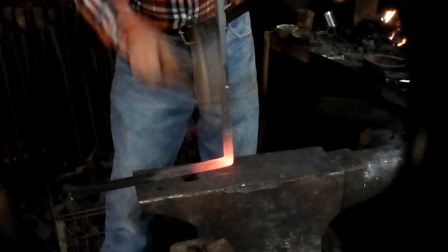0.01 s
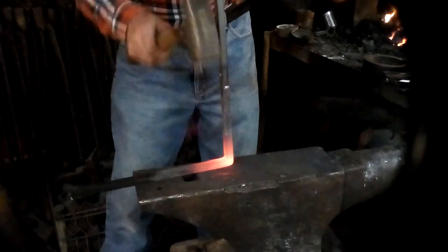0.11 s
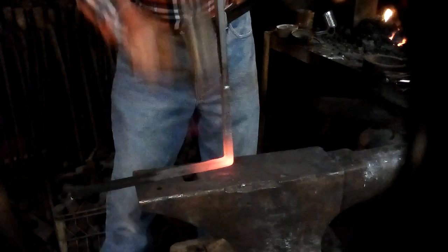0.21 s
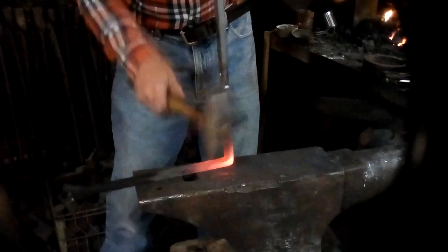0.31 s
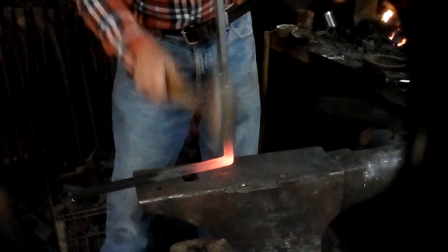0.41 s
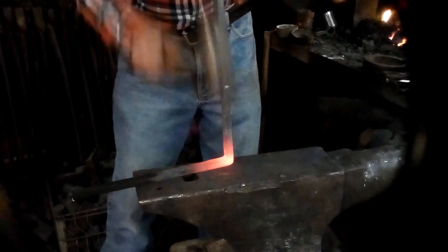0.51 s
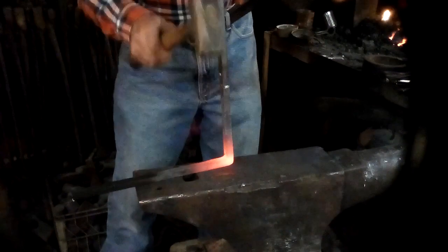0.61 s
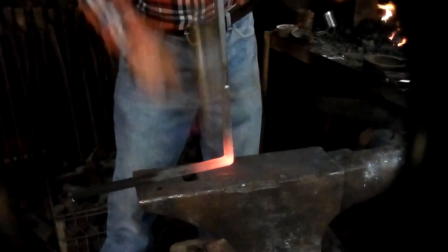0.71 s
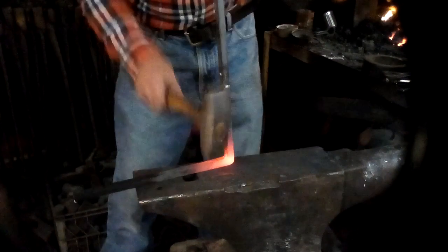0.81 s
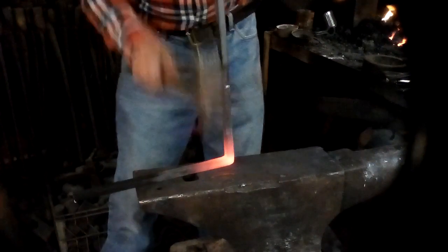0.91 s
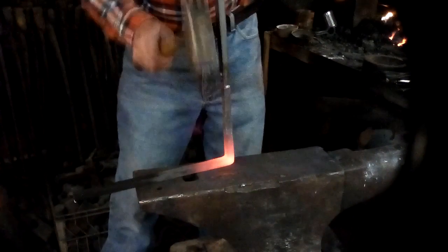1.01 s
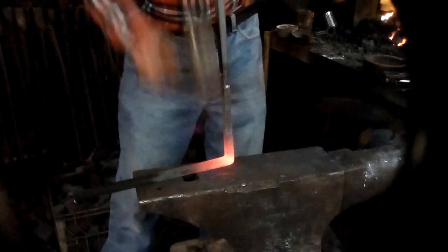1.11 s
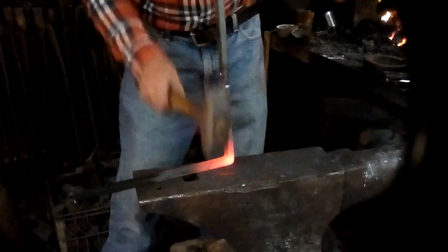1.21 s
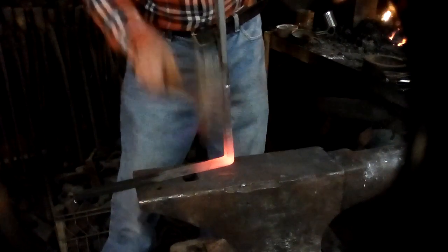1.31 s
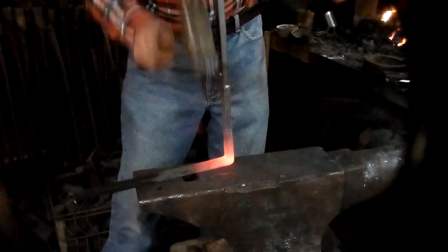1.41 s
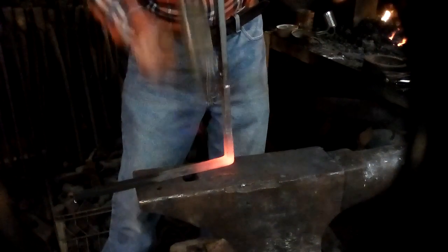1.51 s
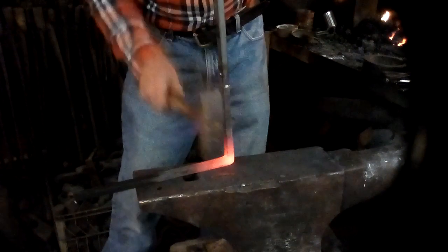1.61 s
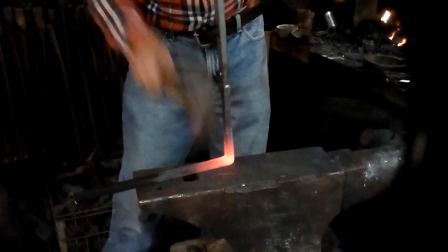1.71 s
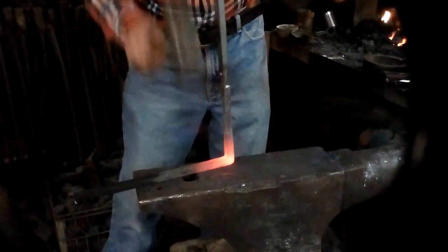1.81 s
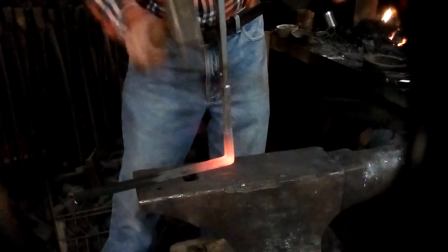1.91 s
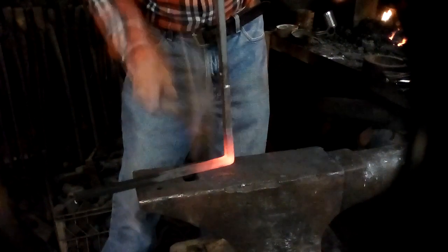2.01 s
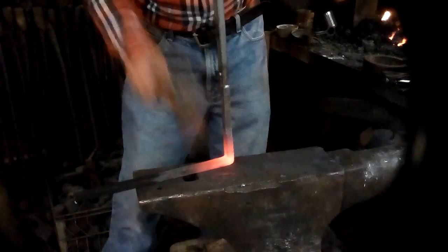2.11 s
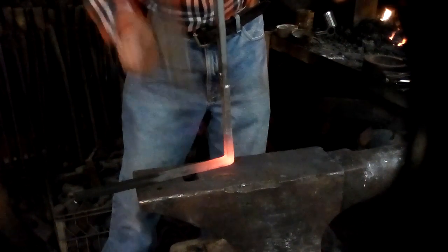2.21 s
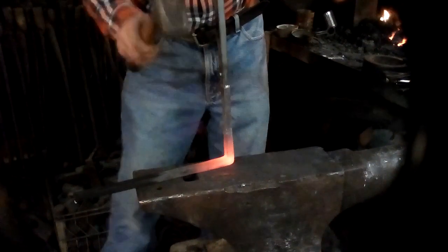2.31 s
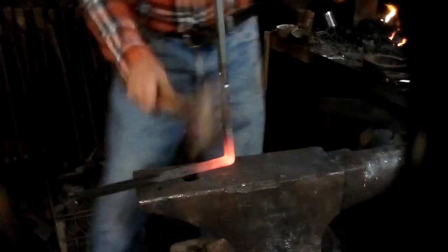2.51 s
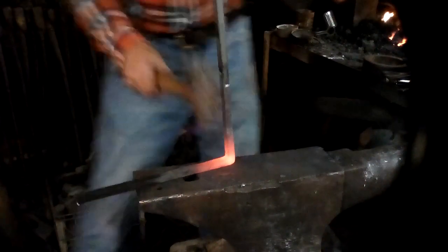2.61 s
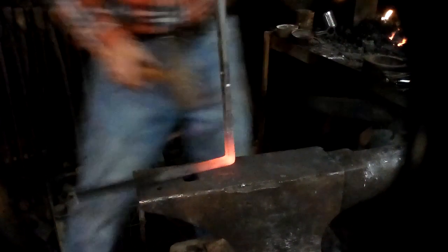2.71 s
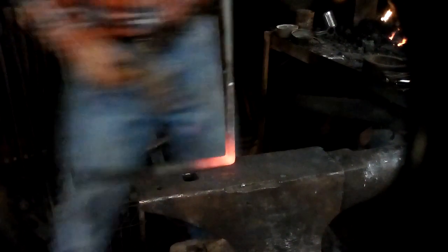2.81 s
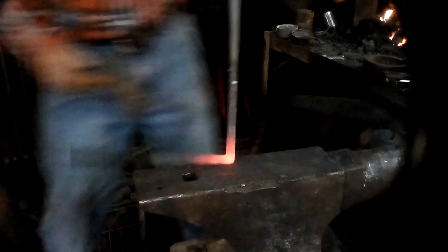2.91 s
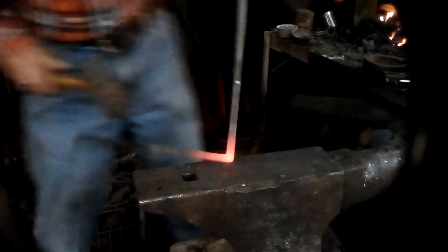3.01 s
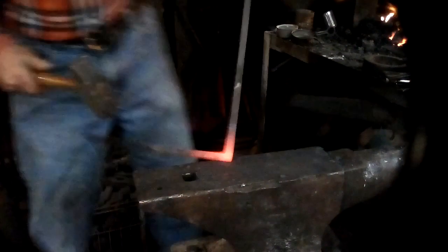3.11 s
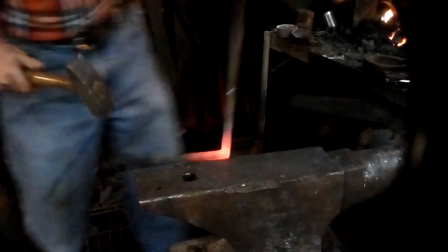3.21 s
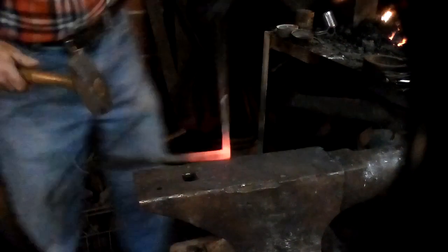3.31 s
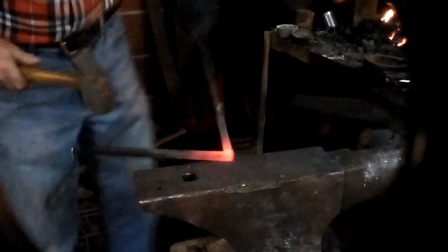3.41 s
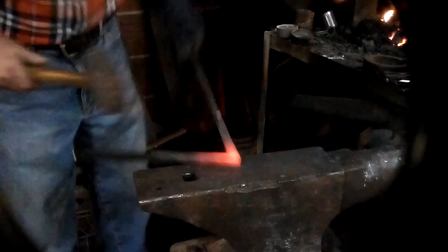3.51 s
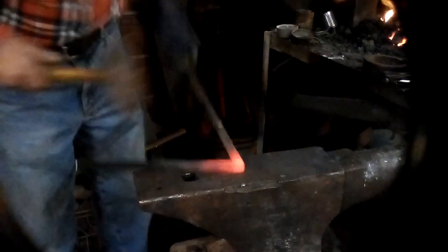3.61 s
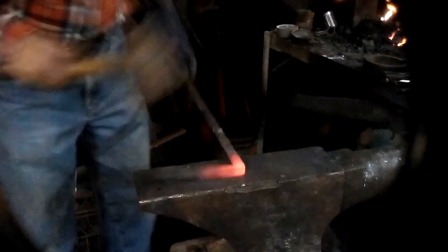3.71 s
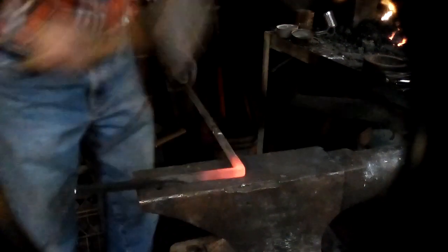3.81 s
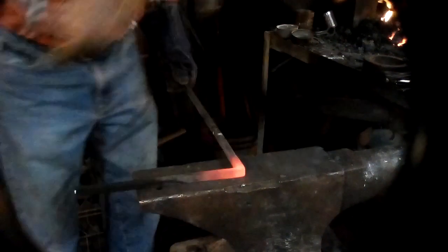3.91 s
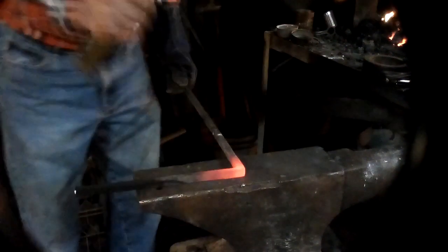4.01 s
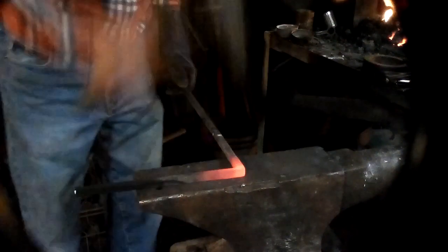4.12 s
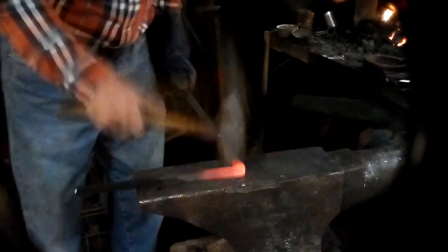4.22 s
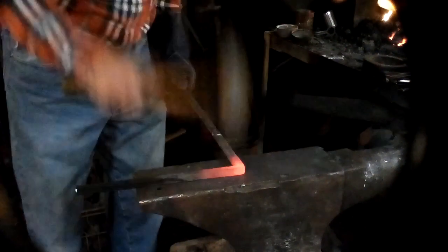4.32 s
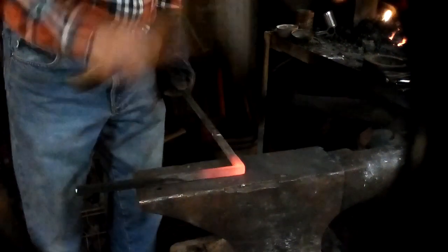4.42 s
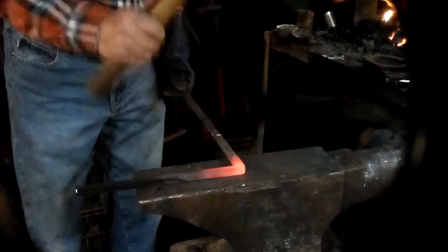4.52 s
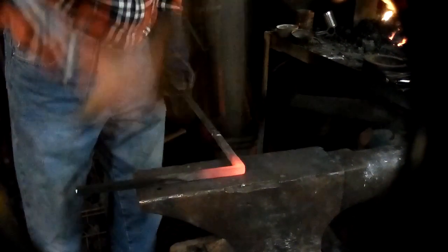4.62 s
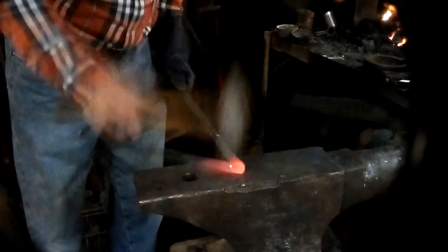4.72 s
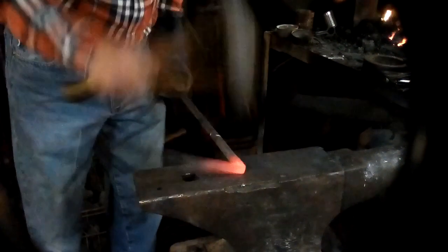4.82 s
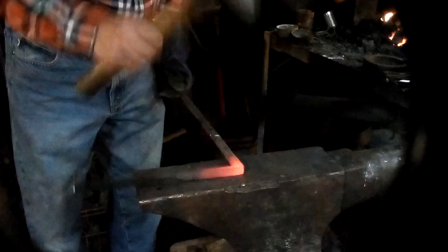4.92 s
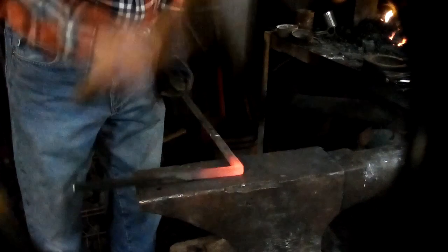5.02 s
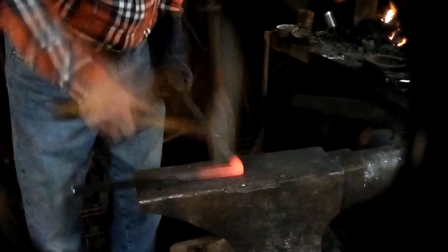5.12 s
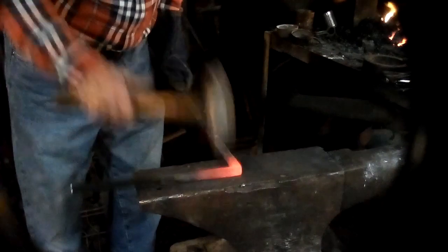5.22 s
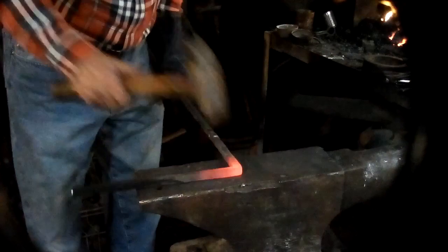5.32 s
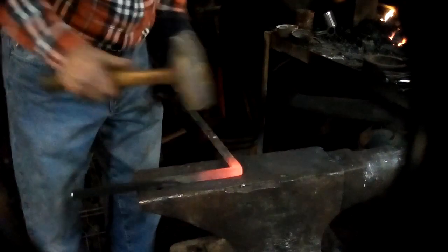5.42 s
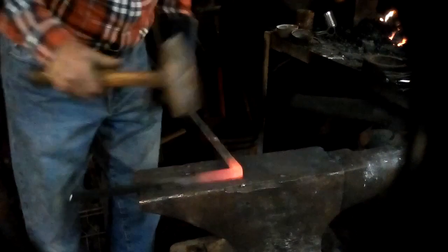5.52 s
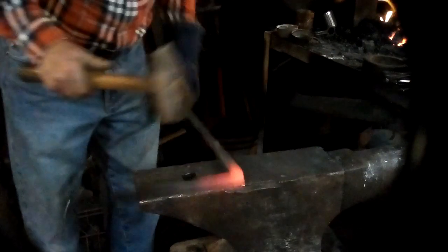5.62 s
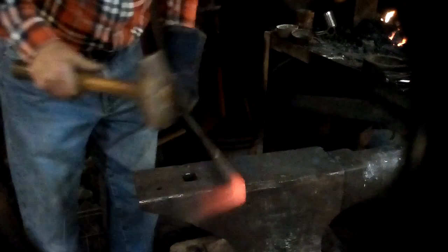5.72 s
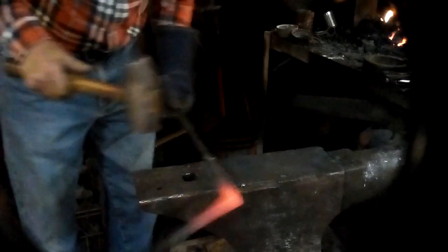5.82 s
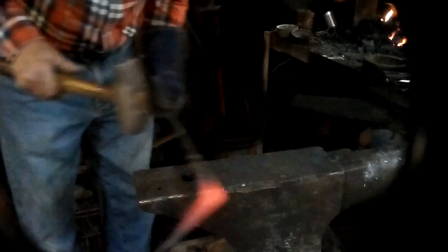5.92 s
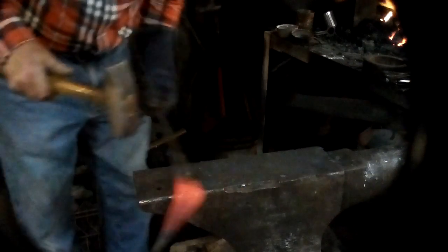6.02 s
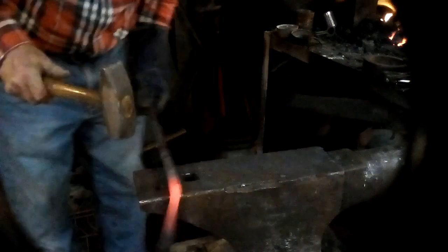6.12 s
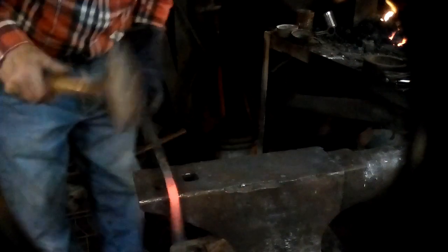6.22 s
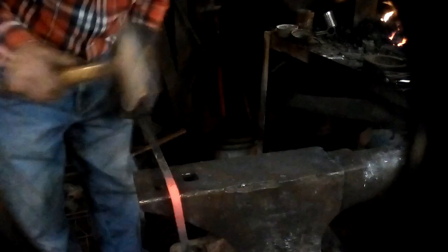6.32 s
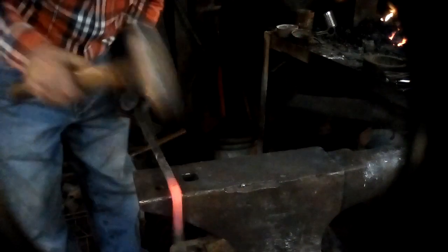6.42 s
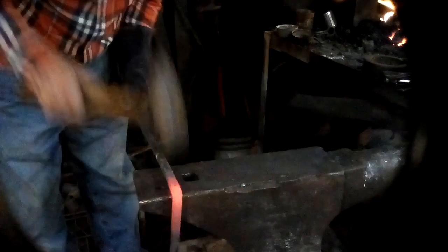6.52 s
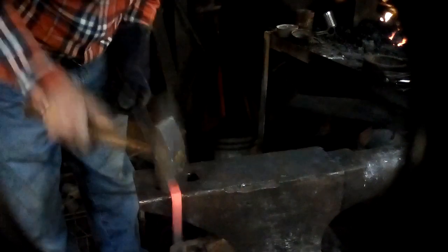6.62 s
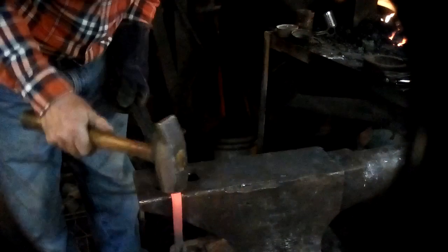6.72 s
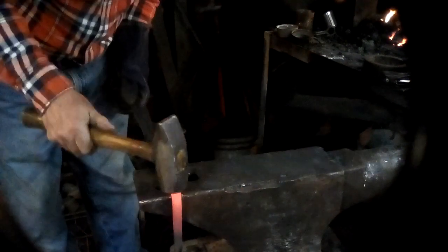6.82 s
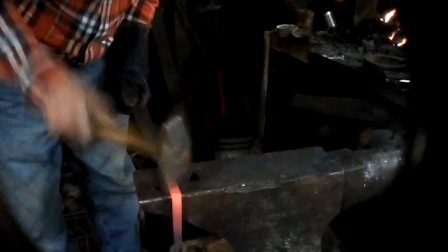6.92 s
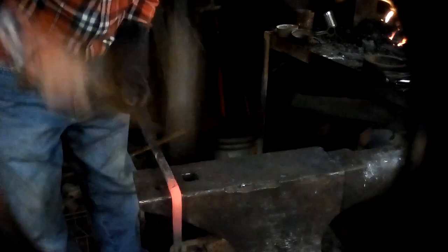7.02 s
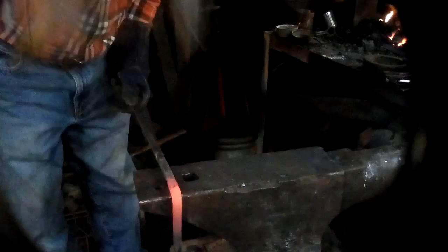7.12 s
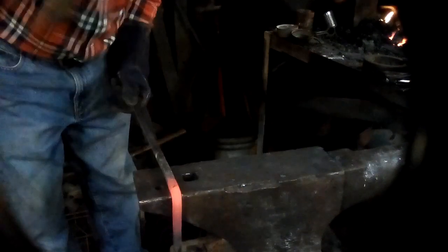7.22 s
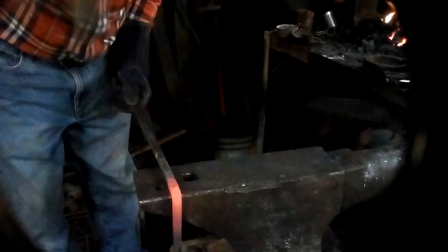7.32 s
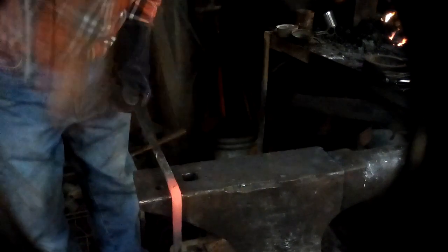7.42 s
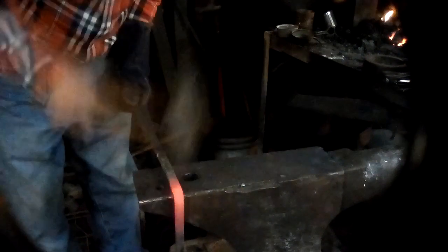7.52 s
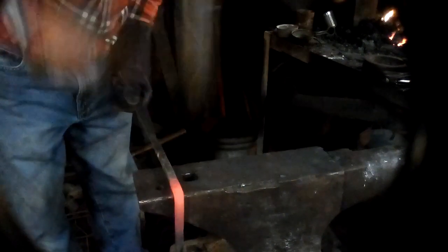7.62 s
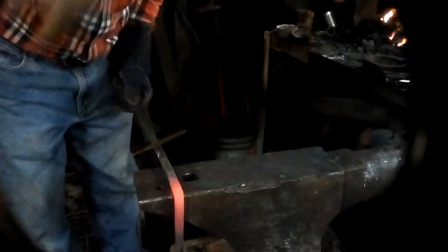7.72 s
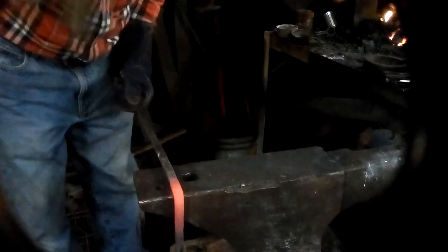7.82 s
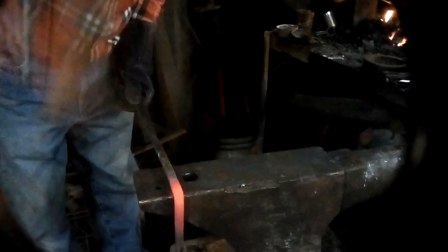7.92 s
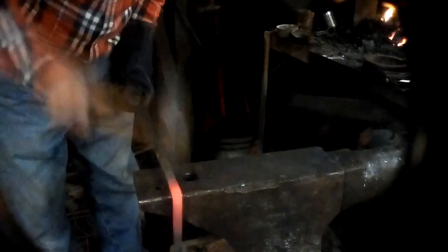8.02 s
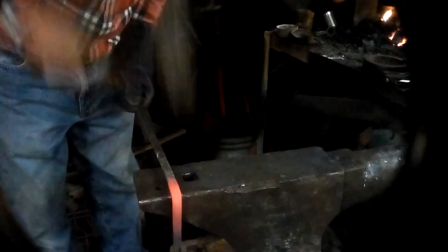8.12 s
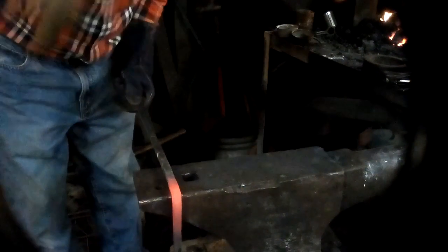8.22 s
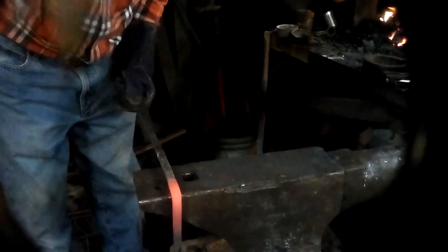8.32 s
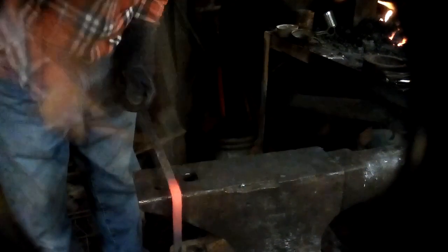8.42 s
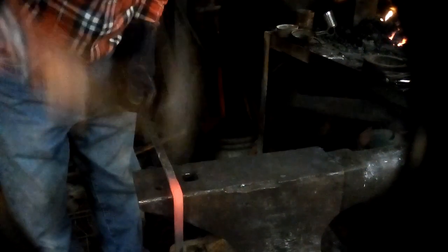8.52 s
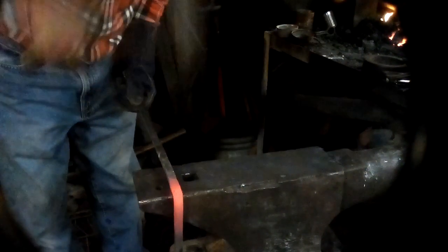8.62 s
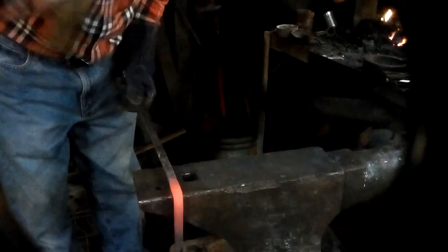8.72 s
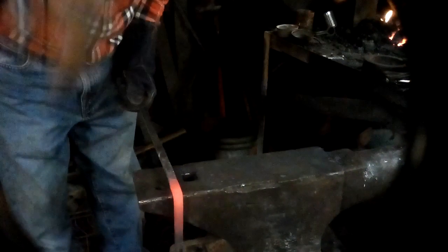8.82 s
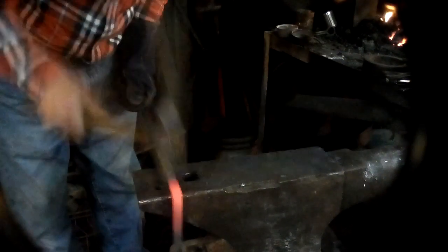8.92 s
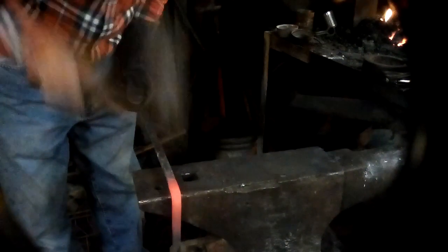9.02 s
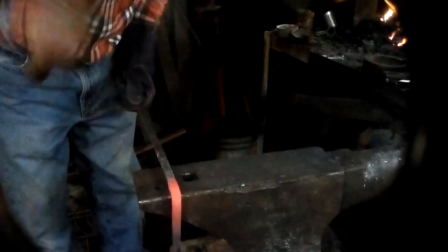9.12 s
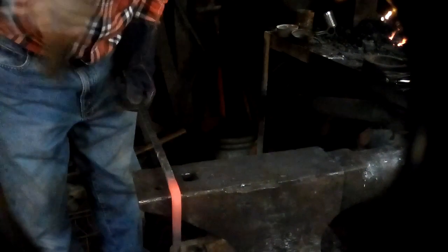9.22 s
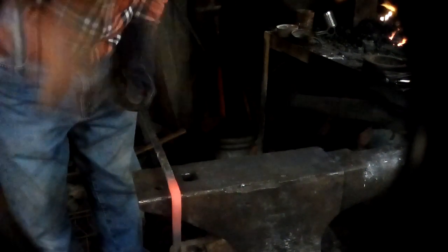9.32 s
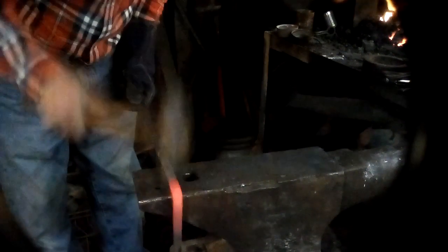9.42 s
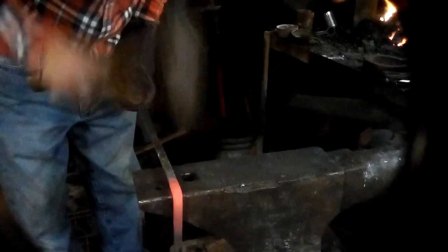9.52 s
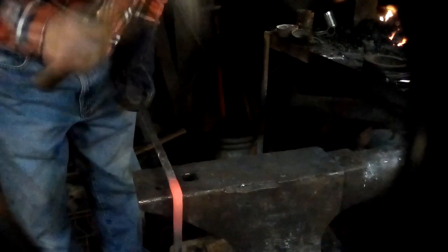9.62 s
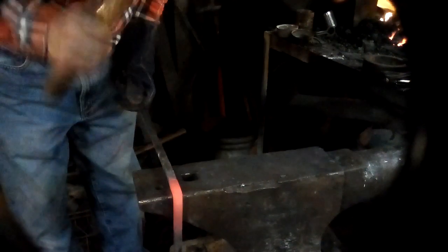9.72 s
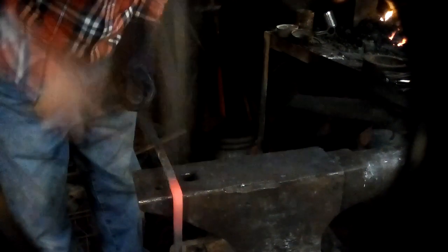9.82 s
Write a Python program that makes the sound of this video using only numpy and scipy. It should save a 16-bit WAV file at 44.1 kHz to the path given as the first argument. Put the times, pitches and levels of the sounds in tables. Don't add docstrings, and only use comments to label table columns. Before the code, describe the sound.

Close, loud anvil hammering: each blow is a broadband crack with a small thud and a quickly fading metallic ring. Three runs at roughly two blows a second are separated by shuffling boots, sliding metal and knocks of the bar. The last run rings most freely. Short room reverberation, faint steady forge hum and hiss, mono sound with flattened, slightly overloaded peaks.

```python
import sys
import numpy as np
from scipy import signal
from scipy.io import wavfile
from scipy.ndimage import uniform_filter1d

SR = 44100
rng = np.random.default_rng(int(sys.argv[2]) if len(sys.argv) > 2 else 0)


def boost(x):
    u = np.asarray(x, float) / 20
    return 10 ** u


def to_wav(s):
    ch = np.atleast_2d(s).T
    pcm = np.round(np.clip(ch, -1, 1) * 32767)
    wavfile.write(sys.argv[1], SR, pcm.astype(np.int16))


N = 434385

ANVIL_HZ = [1335, 1690, 1832, 1910, 2095, 2372, 2490, 2618, 2709, 2903, 3387, 3424, 3635, 3760, 4010, 4272,
            4599, 4935, 5157, 5658, 5825, 6000, 6135, 6230, 6605]
HEAD_HZ = [6968, 7300, 7570, 7900, 8252, 8487, 8935, 9405, 9630, 10325, 10540, 11390, 11820, 12100, 12785,
           13475, 13790, 14320, 14735, 14830, 15455, 15615]
SPLIT_HZ = rng.uniform(7.5, 8.8, len(ANVIL_HZ + HEAD_HZ))


def evened(x):
    return x / np.sqrt(np.mean(x ** 2) + 1e-20)


def read(points, hz):
    f, value = np.transpose(points)
    return np.interp(np.log(hz + 1), np.log(f + 1), value)


def add(mix, s, sound):
    part = mix[round(s * SR):][:len(sound)]
    part += sound[:len(part)]


def coloured(x, points):
    log_gain = np.log(evened(boost(read(points, np.fft.rfftfreq(8192, 1 / SR)))))
    circle = np.concatenate([log_gain, log_gain[-2:0:-1]])
    spectrum = np.exp(np.conj(signal.hilbert(circle)))
    taps = np.fft.ifft(spectrum).real[:4096]
    return signal.oaconvolve(x, taps)[:len(x)]


def air():
    # frequency in Hz, spectrum level in dB per Hz.
    air_tone = [(15, -46), (25, -9), (103, 3.5), (470, -1.5), (510, -4), (634, -8), (1320, -11.5),
                (1640, -11), (2600, -15.5), (4240, -14.5), (4990, -12.5), (8140, -30.5), (12900, -42.5),
                (15200, -18), (16500, -26)]
    return boost(-59) * coloured(rng.standard_normal(N), air_tone)


def stroke(make, top_s, top_db, swell, fade):
    t = np.arange(-.2, .3, 1 / SR)
    down_db = np.where(t < 0, -t * swell, t * fade)
    gate = np.clip(4 - 1.5 * down_db / 30, 0, 1)
    envelope = boost(top_db - down_db) * gate * signal.windows.tukey(len(t), .1)
    return top_s + t[0], envelope * evened(make(len(t)))


def shuffling(length):
    shuffle_tone = [(50, -28), (130, 11), (280, 21.5), (500, -20), (1500, -34), (16000, -70)]  # (Hz, dB per Hz)
    return coloured(rng.standard_normal(length), shuffle_tone)


def rasping(length):
    # frequency in Hz, spectrum level in dB per Hz.
    rasp_tone = [(88, -14), (150, 6), (366, -11), (601, -3), (906, -9), (1890, -6), (2710, -14),
                 (5200, -15), (9000, -45), (11700, -79), (19800, -120)]
    grain_db = 1.7 * rng.exponential(1, length)
    return coloured(rng.standard_normal(length) * boost(grain_db), rasp_tone)


def modes(column, last, rise_s):
    # level in dB when struck upright, flat, over the edge, knocked.
    anvil_db = [(0.0, -9.5, -17.0, 13.5), (2.5, 1.5, 6, 14), (5.5, -12.5, 8, 11), (1.5, 4.5, 13.0, 3.5),
                (3, 1.0, -4, 9), (4.0, -6.0, 11.5, 6.0), (-12.0, -8.5, 8, 8), (-31.5, -22.0, 19, -7.5),
                (-19.5, 12.5, 18.5, 14), (9.0, 5.5, 15, 17.5), (-1.0, 3.5, 11, -19.5),
                (10, 2.0, 15.0, 16.5), (6.0, 5.5, 8.5, 4), (6.5, 8.0, -2.5, 11.5), (0.0, 6.5, 6, -2.0),
                (11.0, 11.5, 13.5, 21.5), (7.0, 10.5, 14.0, 6), (10, 9.5, 6, -6.5), (-20.0, -4.5, 3, -22.0),
                (14, 10.5, 18.5, 13.5), (-11.5, 3, 8, -21.5), (9, 9, -1.5, -12), (0.0, 10, -8.5, 3),
                (3.5, 2.5, 1.5, -14.5), (5.5, 8.5, 6.0, -3.0)]
    # level in dB when struck upright, flat, over the edge, knocked.
    head_db = [(-7.0, -2.0, -9, -25.0), (-6, 1.5, -3, -24.0), (-11.5, -7.5, -15.5, -4),
               (-11.5, -14, -17.0, -10.5), (-16.5, -8.5, -19.5, -31.5), (-12.5, -9, -28.5, -10.0),
               (-8.0, -8, -26.0, -14.0), (-12.5, -10.0, -36.0, -24.5), (-9, -14.5, -30, -23.5),
               (-21, -29.5, -23.0, -33.5), (-15.5, -15, -14, -17.0), (-16.5, -22.0, -18, -33.5),
               (-23.5, -20.5, -36, -34.0), (-15, -17.5, -40.0, -33.0), (-18.5, -26.5, -38, -32.0),
               (-16.5, -35.5, -32.0, -35.0), (-28.0, -33.0, -24.0, -41.5), (-16.5, -15.0, -22.0, -32.5),
               (-25.5, -10.0, -13.5, -32.5), (-4, -3.5, -22.0, -37.5), (-11.0, -3.5, -27, -25.0),
               (-5.5, -10.0, -13.0, -25.0)]
    damped_hz = [1832, 1910, 2095, 2618, 3387, 3635, 3760, 5157, 6000, 6135, 6230, 6605, 10540, 14735,
                 14830, 15455]
    pure_hz = [2709, 2903]
    t = np.arange(SR // 2) / SR
    level_db = np.array(anvil_db + head_db)[:, column, None]
    hz = np.array(ANVIL_HZ + HEAD_HZ)[:, None]
    width_hz = np.where(np.isin(hz, HEAD_HZ), 42, 27.2)
    width_hz = width_hz * np.where(np.isin(hz, damped_hz), 2.8, 1)
    fall = width_hz * boost(level_db - 60 * t * width_hz / last)
    twin = np.where(np.isin(hz, pure_hz), .35, .8)
    pair = np.sin(2 * np.pi * hz * t) + twin * np.sin(2 * np.pi * (hz - SPLIT_HZ[:, None]) * t)
    return fall * pair * (1 - np.exp(-t / rise_s)) * np.cos(np.pi * t) ** .5


def ringing(bank, favoured_hz, treble_db, scatter_db):
    hz = np.array(ANVIL_HZ + HEAD_HZ)
    level_db = scatter_db * rng.standard_normal(len(hz)) + treble_db * (hz > 7500)
    for f in favoured_hz:
        distance = abs(hz - f)
        level_db = level_db + 10 * (distance == distance.min())
    ring = (boost(level_db) * rng.choice([-1, 1], len(hz))) @ bank
    return ring / np.sqrt(np.mean(ring[:400] ** 2))


def sliding(length):
    out, bank = np.zeros(length), modes(column=3, last=4.1, rise_s=0.0036)
    for _ in range(8):
        slips = (rng.random(length) < 40 / SR) * rng.standard_normal(length)
        out += signal.fftconvolve(slips, ringing(bank, [2490], 3.0, 7.0))[:length]
    return evened(out) + evened(rasping(length))


def handling():
    # top in seconds, level in dB, swell in dB a second, fade in dB a second.
    steps = [
        (3.06, -52, 600, 300),
        (3.215, -49, 600, 120),
        (3.344, -43, 900, 440),
        (3.49, -49, 900, 70),
        (5.75, -45.5, 37, 150),
        (5.93, -58, 800, 500),
        (7.11, -58, 500, 170),
        (7.32, -65, 150, 300.5),
    ]
    mix = np.zeros(N)
    add(mix, *stroke(rasping, top_s=3.5, top_db=-39, swell=210, fade=246))
    add(mix, *stroke(sliding, top_s=5.735, top_db=-42.5, swell=72, fade=105))
    for row in steps:
        add(mix, *stroke(shuffling, *row))
    return mix


def impacts(table, bank, force_db, ring_db, thud_db, stump_db, crack_s, rattle_db):
    # frequency in Hz, spectrum level in dB per Hz.
    crack_tone = [(30, -42.5), (62, -11.5), (84, -12.5), (170, 3.5), (500, -3.5), (900, -3), (1250, -9),
                  (2500, -3.5), (5800, -9), (7000, -15), (8300, -30.5), (13500, -32.5), (15500, -18.5)]
    mix, t = np.zeros((2, N)), np.arange(SR // 3) / SR
    stump_hz, stump_t60_s = 266.6, .09
    stump = boost(stump_db - 60 * t / stump_t60_s) * np.sin(2 * np.pi * stump_hz * t) * np.minimum(t / 0.012, 1)
    for s, peak_db, *favoured_hz, treble_db, more_ring_db in table:
        noise = rng.standard_normal(len(t))
        grit = noise - uniform_filter1d(noise, size=90)
        push = .5 * np.exp(-t / 0.00044)
        burst = grit * np.exp(-t / crack_s) + push
        bounces = (rng.random(len(t)) < 120 / SR) * rng.standard_normal(len(t)) * np.exp(-t / .05)
        chatter = np.convolve(bounces, np.hanning(14), "same")
        tone = [(f, db + treble_db * (f > 7500) + thud_db * (f < 700)) for f, db in crack_tone]
        crack = coloured(burst + boost(rattle_db) * chatter, tone)
        add(mix[0], s, boost(peak_db + force_db) * (crack + stump))
        ring = ringing(bank, favoured_hz, treble_db, scatter_db=1.5)
        add(mix[1], s, boost(peak_db + force_db + ring_db + more_ring_db) * ring)
    return mix


def bar_knocks():
    # start in seconds, peak in dB, favoured mode in Hz, treble in dB, ring in dB.
    knocks = [
        (3.482, -45, 4010, -10, -3.5),
        (3.672, -34.5, 2707, -10, 0),
        (6.055, -27, 3760, -9, 4.5),
        (6.149, -18.5, 2903, -7.5, 0.5),
        (6.209, -24.5, 3450, -15, -9.5),
    ]
    bank = modes(column=3, last=5.5, rise_s=.0007)
    return impacts(knocks, bank, force_db=2.0, ring_db=-2.5, thud_db=6, stump_db=-1.5, crack_s=0.0086, rattle_db=-7)


def hammer_clinks():
    # start in seconds, peak in dB, favoured mode in Hz, treble in dB, ring in dB.
    clinks = [
        (.611, -16.5, 4268, -5, -0.5),
        (2.498, -29.5, 2372, -10, -17),
        (2.512, -29, 2372, -11, -17),
        (2.864, -22.5, 4935, -12, -16.5),
        (5.012, -9.5, 6000, -0.5, 0),
        (8.808, -37, 2610, -18, 14),
    ]
    bank = modes(column=0, last=1.3, rise_s=.002)
    return impacts(clinks, bank, force_db=-5.5, ring_db=-5.5, thud_db=1.2, stump_db=-25,
                   crack_s=0.0024, rattle_db=-38.5)


def upright_blows():
    # start in seconds, peak in dB, favoured mode in Hz, treble in dB, ring in dB.
    upright = [
        (0.391, -19.5, 4608, 4.5, 3),
        (0.825, -50.5, 4220, 5.5, 21),
        (0.839, -33, 4220, 1, -9),
        (0.851, -20, 4272, 3, 1.5),
        (1.263, -46.5, 2906, -6, 9.5),
        (1.277, -18.5, 2906, 5.5, 7.5),
        (1.695, -19.5, 2906, 0, 7),
        (2.124, -18.5, 4608, 3.5, 4),
        (2.57, -16.5, 4952, 8, 5),
    ]
    bank = modes(column=0, last=5.5, rise_s=.0002)
    return impacts(upright, bank, force_db=22.5, ring_db=-11, thud_db=-2.5, stump_db=-29,
                   crack_s=0.0047, rattle_db=-4.5)


def flat_blows():
    # start in seconds, peak in dB, favoured mode in Hz, treble in dB, ring in dB.
    flat = [
        (3.831, -35, 7579, -1.5, 7.5),
        (4.294, -14.5, 2713, 5, 3),
        (4.767, -12.5, 2713, 6.5, 1.5),
        (5.215, -15, 5641, 7.5, 4),
        (6.711, -22.5, 2709, -10, -6),
    ]
    bank = modes(column=1, last=6, rise_s=.0004)
    return impacts(flat, bank, force_db=20, ring_db=-10, thud_db=-0.5, stump_db=-15, crack_s=0.0051, rattle_db=-8.0)


def edge_blows():
    # start in seconds, peak in dB, favoured mode in Hz, treble in dB, ring in dB.
    edge = [
        (7.56, -14.5, 2627, 3, -7.5),
        (8.062, -14.5, 4586, 3.5, 2.5),
        (8.534, -15, 4586, 5, 4),
        (9.0, -14.5, 4586, 4.5, 3),
        (9.479, -18, 4586, 5.5, -1.5),
    ]
    bank = modes(column=2, last=8, rise_s=.0003)
    return impacts(edge, bank, force_db=28, ring_db=-4.0, thud_db=-1.5, stump_db=-25, crack_s=0.0077, rattle_db=-13)


def forge(x):
    # frequency in Hz, reverberation time (60 dB) in seconds.
    room = [(60, 0.67), (250, 0.59), (1000, 0.56), (4000, 0.49), (8000, 0.41), (16000, 0.23)]
    hz, t, z = signal.stft(rng.standard_normal(SR), SR, nperseg=256)
    decay = boost(-60 * t / read(room, hz)[:, None])
    tail = signal.istft(z * decay, SR, nperseg=256)[1]
    tail = tail * np.minimum(np.arange(len(tail)) / (0.0017 * SR), 1)
    return signal.fftconvolve(x, tail / np.linalg.norm(tail))[:N]


def scene():
    crack, ring = upright_blows() + flat_blows() + edge_blows() + hammer_clinks() + bar_knocks()
    direct = boost(-1.5) * crack + ring
    wet = forge(boost(-3.5) * crack + boost(-6) * ring)
    return (direct + wet + handling() + air())[None]


def top_cut(x):
    return signal.sosfilt(signal.butter(12, 17150, fs=SR, output="sos"), x)


def record(dry):
    block_size, block_start = 882, 353
    input_filter = signal.firwin(511, 15700, window=("kaiser", 9), fs=SR)
    dry = signal.oaconvolve(dry, input_filter[None], "same")
    block = (np.arange(N) + block_size - block_start) // block_size
    fourth = np.bincount(block, dry[0] ** 4) / block_size
    wanted_db = 0.78 * np.maximum(5 * np.log10(fourth + 1e-24) + 22, 0)
    cut_db = np.zeros(len(fourth))
    for k in range(1, len(fourth)):
        change_db = .85 * (wanted_db[k] - cut_db[k - 1])
        cut_db[k] = cut_db[k - 1] + np.clip(change_db, -3.1, 30.0)
    deep_db = np.maximum(cut_db[block] - 18.5, 0)
    lag = np.exp(-1 / (0.038 * SR))
    late_db = np.minimum(deep_db, signal.lfilter([1 - lag], [1, -lag], deep_db))
    held = dry / boost(uniform_filter1d(cut_db[block] - deep_db + late_db, size=150))
    held = held / (1 + (held / .72) ** 6) ** (1 / 6)
    output_filter = signal.firwin(255, 16900, window=("kaiser", 9), fs=SR)
    held = signal.oaconvolve(held, output_filter[None], "same")
    narrow = signal.butter(2, [6550, 6850], "bandpass", fs=SR, output="sos")
    band = signal.sosfilt(narrow, rng.standard_normal(N))
    level = np.sqrt(np.bincount(block, held[0] ** 2) / block_size)
    return top_cut(held + boost(-38) * evened(band) * level[block])


dry = scene()
out = record(dry)
to_wav(out)
```